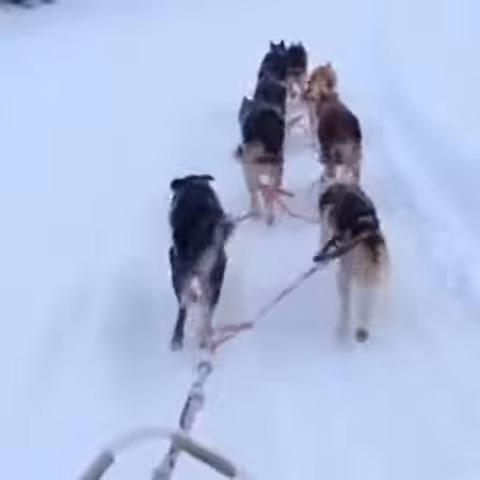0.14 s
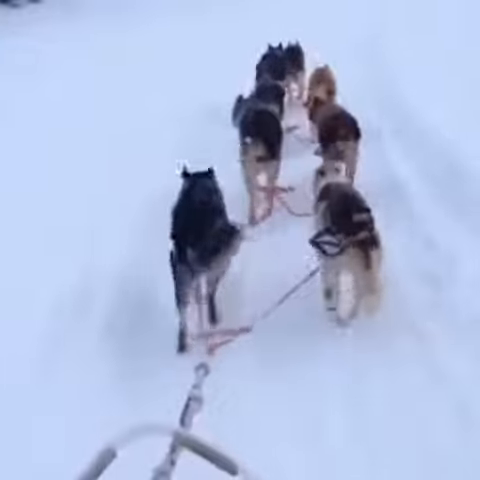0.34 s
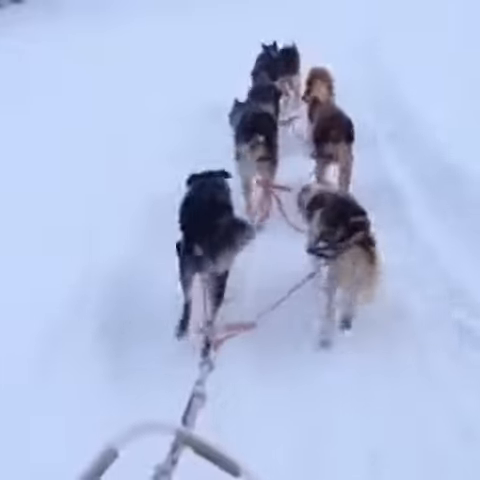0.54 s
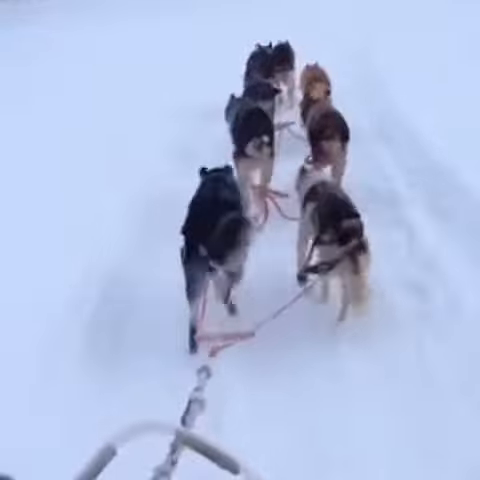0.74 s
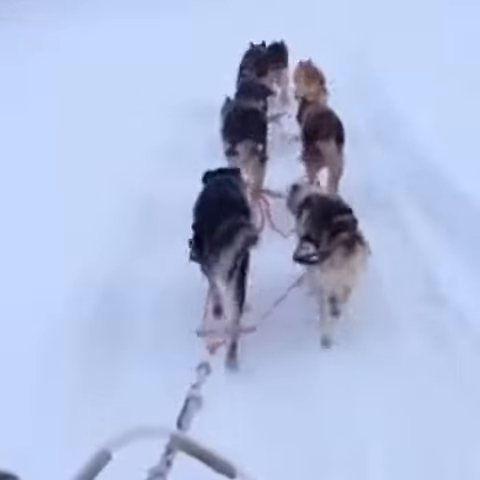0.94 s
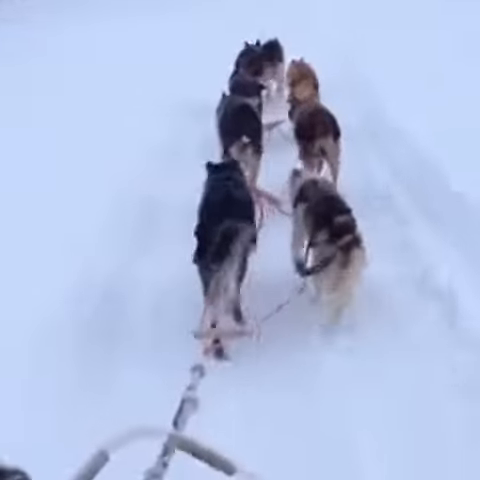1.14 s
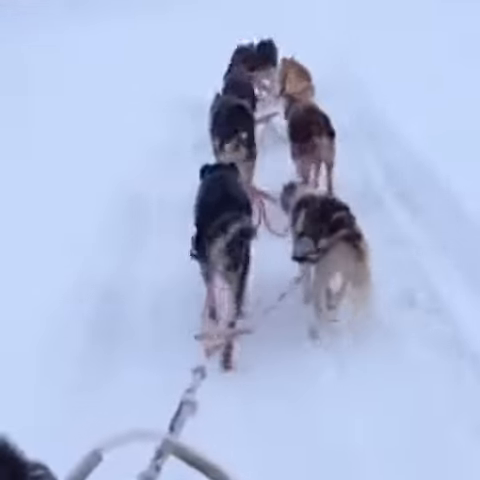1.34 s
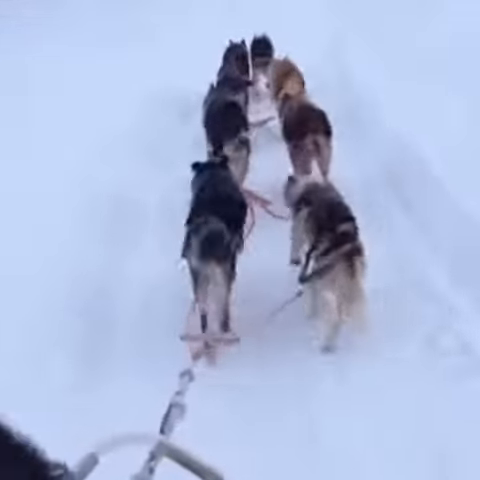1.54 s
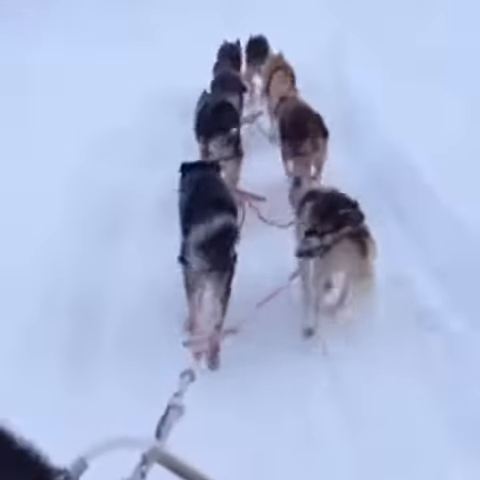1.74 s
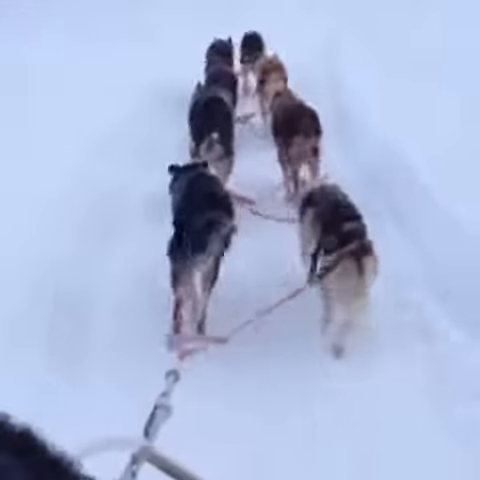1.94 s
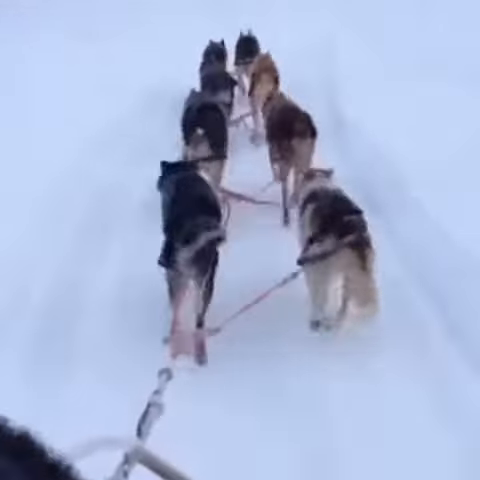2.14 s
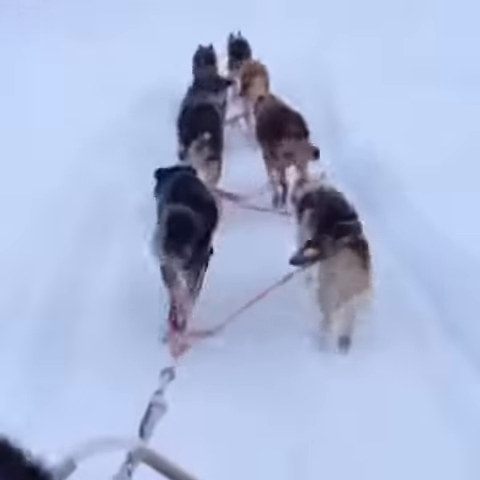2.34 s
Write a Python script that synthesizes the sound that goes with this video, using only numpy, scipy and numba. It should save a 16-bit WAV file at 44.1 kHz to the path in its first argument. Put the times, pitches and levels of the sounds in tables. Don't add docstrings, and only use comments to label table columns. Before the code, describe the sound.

A grainy, steady snow glide heard from aboard a dog sled in the open, with dull frame knocks, soft wind buffets, a sharp ice crack midway, later rougher scuffs and tiny high metal squeaks.

```python
import sys
import numpy as np
from scipy import signal
from scipy.io import wavfile
from scipy.ndimage import uniform_filter1d
from numba import njit

SR = 44100
rng = np.random.default_rng(int(sys.argv[2]) if len(sys.argv) > 2 else 0)


def master_out(mix):
    frames = np.transpose(np.atleast_2d(mix))
    ceiling = np.clip(frames, -1, 1)
    pcm = np.round(ceiling * 32767).astype(np.int16)
    wavfile.write(sys.argv[1], SR, pcm)


def elevation(decibels):
    levels = np.asarray(decibels, float)
    return 10 ** (levels / 20)


N = 110250

# time in seconds, hiss level in dB, softness of the snow in dB.
GLIDE = [(0, -44, 1), (.04, -46.5, 1), (.165, -47, 1), (.18, -44, 1.5), (.3, -46, 1.3), (.5, -46.5, 1.1),
         (.8, -46.5, 1), (1.0, -45.5, 1), (1.2, -46.5, 0.4), (1.35, -48.5, 0.5), (1.5, -47, 0.5),
         (1.72, -49, 0.5), (1.95, -49.5, 0.5), (2.2, -50.5, 0), (2.34, -49.5, 0.5), (2.5, -47.5, 0.5)]
# frequency in Hz, level in dB per Hz.
SNOW_COLOUR = [(290, -19), (500, -3), (952, -3.5), (2000, -4), (2830, 0), (3210, -19), (4040, -2),
               (11500, -14.5), (15300, -23.5)]
# frequency in Hz, width in Hz, level in dB.
RUNNER_RINGS = [(398.4, 97, -11), (752, 58, -16.5), (1817, 250, -19.5), (3400, 520, -9.5),
                (3930, 540, -11.5)]
# time in seconds, shaking in dB, wind in dB.
SHAKE_AND_WIND = [(0, -35.5, -41), (.26, -39, -53), (.54, -43.5, -48.5), (.85, -39.5, -48.5),
                  (1.0, -37.5, -52), (1.12, -37.5, -44), (1.23, -41.5, -47.5), (1.5, -33, -48),
                  (1.72, -38.5, -52), (2.0, -31, -49), (2.2, -32.5, -49), (2.33, -38, -44), (2.5, -36, -47)]
# frequency in Hz, width in Hz, level in dB.
FRAME_RINGS = [(144, 48, 0.5), (187.7, 32.5, -4.5), (238, 53, -1.5), (302.3, 33, -6), (403.7, 72, -5.5)]
# middle in seconds, level in dB, pitch in Hz, length in seconds.
BUMPS = [(0.028, -38.5, 382, 0.021), (0.286, -30, 174, 0.0058), (0.455, -31.5, 244.5, 0.0092),
         (0.649, -30, 177.8, 0.0057), (.01, -36, 174.7, .02), (.27, -38, 400, 0.02),
         (.35, -41.5, 330, 0.021), (.625, -41.5, 250, 0.026), (.835, -36.5, 290, 0.032),
         (.86, -38.5, 200, 0.032), (.928, -39, 400, 0.037), (2.012, -27, 155, 0.014), (1.81, -39, 128, .06),
         (2.22, -34, 135, .04), (2.045, -37, 110, .02), (2.41, -38, 110, .04), (2.024, -35, 217.7, .014),
         (2.268, -33.5, 225, 0.013), (2.285, -34, 199.7, 0.019), (0.964, -26.5, 190.2, 0.011),
         (0.985, -28, 199.4, 0.0049), (1.032, -29, 234.4, 0.018), (1.075, -29, 212.2, 0.0099),
         (1.153, -27.5, 188, 0.012), (1.167, -24, 290, 0.0087), (1.166, -37.5, 728, 0.0085),
         (1.177, -30.5, 149, 0.017), (1.214, -38.5, 184.4, .02), (1.255, -38.5, 159.6, 0.013),
         (1.298, -40.5, 300, 0.023), (1.335, -35.5, 180, 0.039), (1.365, -41, 244.4, 0.034),
         (1.43, -41.5, 390, 0.021), (1.182, -32, 290, .013), (1.443, -31, 169.7, 0.026),
         (1.53, -33, 199.3, 0.035), (1.572, -32.5, 206.5, 0.0091), (1.868, -32.1, 224.3, 0.009),
         (1.93, -38, 225.3, 0.011), (1.962, -20.5, 190.1, .007), (1.998, -19.5, 169.6, 0.0097),
         (2.042, -26.5, 165.8, 0.014), (2.063, -31, 171.4, 0.0071), (2.115, -42, 162.7, 0.0075),
         (2.137, -30.5, 250.7, 0.0086), (2.188, -27, 219.6, 0.011), (2.209, -36.5, 301, 0.014),
         (2.228, -32, 232.8, 0.0085), (2.245, -32.5, 139.8, 0.023), (2.373, -26.5, 183.5, 0.0045),
         (2.434, -25, 247.3, 0.016), (2.484, -34, 258, 0.028)]
# middle in seconds, level in dB, pitch in Hz, length in seconds.
BUFFETS = [(0.036, -44, 58, 0.025), (0.135, -33.5, 70, 0.019), (0.35, -38, 75.1, 0.02),
           (0.593, -35, 67, 0.014), (0.978, -28, 75, 0.018), (1.04, -39, 56.5, 0.015),
           (1.155, -33, 95.1, 0.0087), (1.554, -38, 70, 0.016), (1.609, -41, 75.2, 0.026),
           (2.058, -40, 76.3, 0.017), (2.104, -38.5, 59.2, 0.043), (2.365, -31.5, 69.8, 0.017)]
# middle in seconds, level in dB, centre in Hz.
SIDE_PATCHES = [
    (.083, -58, 7600),
    (.768, -50, 4900),
    (.78, -62, 11700),
    (.875, -56, 6000),
    (.875, -60, 12200),
    (.967, -50.5, 4900),
    (.967, -56, 6900),
]
# start in seconds, peak in dB, ring in Hz, crunch in dB.
TICKS = [
    (.175, -27, 3900, 2),
    (1.0785, -22, 4200, 3),
    (1.160, -23, 4300, 4),
    (1.242, -23.5, 4000, 2),
    (1.2825, -23, 4800, 4),
    (1.4706, -14, 4700, -6),
    (1.4828, -26, 2300, -6),
    (1.0795, -27, 2400, 0),
]
# middle in seconds, level in dB, pitch in Hz, length in seconds.
RASPS = [(.226, -45, 1760, 0.022), (0.258, -44, 1780, 0.013), (1.783, -45.5, 1870, 0.029),
         (1.927, -42, 1800, 0.021), (2.225, -42, 1930, .012), (2.4, -45, 1800, 0.011),
         (1.7, -44, 1940, .02), (1.6, -45, 3380, .012), (1.89, -46, 4300, .018), (1.912, -40, 4100, 0.015),
         (1.917, -43, 3500, 0.015), (1.927, -45, 3030, .012), (2.007, -44, 3250, 0.013),
         (2.067, -44, 3600, 0.017), (2.177, -41, 3870, .009), (2.176, -46, 4700, .008),
         (2.256, -45.5, 3960, .014), (2.264, -46, 3170, .01), (2.288, -39.5, 3440, .011),
         (2.299, -37.5, 3300, .013), (1.465, -48.5, 3200, 0.031), (1.505, -46.5, 3630, .018),
         (1.628, -42, 3200, .03), (1.636, -42.5, 4140, .022), (1.5, -45, 5400, .014),
         (1.8, -45, 6600, .014), (1.4, -47, 6250, 0.029), (2.48, -45, 1900, .01), (2.496, -41, 1850, .012)]
# middle in seconds, level in dB, centre in Hz, length in seconds.
SCUFFS = [(.19, -47, 3800, 0.03), (1.22, -52, 6000, 0.053), (1.477, -43, 1000, .016),
          (1.508, -47, 1300, .035), (1.638, -39.5, 4500, .036), (1.675, -47, 4500, .03),
          (1.922, -42.5, 2600, .022), (2.21, -47, 3000, .05), (2.45, -45, 2100, .04),
          (2.29, -46, 5000, .03), (1.87, -48, 3000, .018), (1.9, -42, 3700, .045), (1.994, -42, 2300, .009),
          (2.055, -46, 4200, .03), (2.098, -48, 2300, .025), (2.176, -42.5, 3500, 0.011),
          (2.26, -43, 4300, 0.036), (2.304, -44, 1500, .012), (2.42, -46, 4870, 0.025),
          (2.45, -40.5, 3600, 0.015), (2.49, -36.5, 4300, 0.03)]
# middle in seconds, level in dB, pitch in Hz, length in seconds.
SQUEAKS = [(.634, -59.5, 11740, .012), (.648, -46, 11770, .007), (1.035, -47, 11830, .004),
           (1.207, -51, 11800, 0.024), (1.417, -46.5, 11780, 0.047), (1.951, -55, 12000, 0.017),
           (1.947, -58, 13950, .008), (2.197, -49.5, 11765, .024), (2.197, -45.5, 7200, 0.037),
           (2.333, -51, 11820, .006), (2.482, -48, 10750, 0.007)]


def level(x, db):
    return x * elevation(db) / np.sqrt(np.mean(x ** 2))


def curve(table, column):
    rows = np.array(table, float)
    return np.interp(np.arange(N) / SR, rows[:, 0], rows[:, column])


@njit
def resonator(x, hz, width):
    y, band, low = np.empty(len(x)), 0., 0.
    g, damping = np.tan(np.pi * hz / SR), width / hz
    for i in range(len(x)):
        v = (band + g * (x[i] - low)) / (1 + g * (g + damping))
        band, low = 2 * v - band, low + 2 * g * v
        y[i] = damping * v
    return y


def narrow(x, hz, width, second_width=None):
    once = resonator(x, float(hz), float(width))
    return resonator(once, float(hz), float(second_width or width))


def walk(rate):
    k = int(SR / rate)
    steps = np.repeat(rng.standard_normal(N // k + 1), k)
    return 1.44 * uniform_filter1d(uniform_filter1d(steps, k), k)[:N]


def crystals(spread_db):
    size_db = spread_db * np.minimum(rng.exponential(size=N), 5)
    return level(rng.standard_normal(N) * elevation(size_db), 0)


def swells(table, stretch, edge, gain_db, carrier):
    out = np.zeros(N)
    for s, db, hz, length in table:
        reach = 2 * stretch * length
        i = np.arange(max(int((s - reach) * SR), 0), min(int((s + reach) * SR), N))
        u = (i / SR - s) / (.5 * stretch * length)
        out[i] += elevation(db + gain_db) * np.exp(-np.abs(u) ** edge) * carrier(i, hz)
    return out


def ring(wobble, rate):
    drift = np.cumsum(1 + wobble * walk(rate)) / SR

    def tone(i, hz):
        since_middle = drift[i] - drift[i[len(i) // 2]]
        return np.sqrt(2) * np.sin(2 * np.pi * hz * since_middle + hz)
    return tone


def snow():
    grain_db, flicker_db, swell_db = 2.5, .9, .5
    softness, colour = curve(GLIDE, column=2), np.array(SNOW_COLOUR, float)
    swell = walk(22) + walk(40)
    shared_grit = crystals(grain_db)
    hiss = np.zeros(N)
    for hz in np.geomspace(450, 15500, num=20):
        db = np.interp(np.log(hz), np.log(colour[:, 0]), colour[:, 1])
        db = db + 10 * np.log10(hz)
        db = db + flicker_db * walk(18)
        db = db + softness * np.log2(3500 / hz)
        source = 0.8 * shared_grit + 0.59 * crystals(grain_db)
        hiss += elevation(db) * level(narrow(source, hz, hz * 0.4), 0)
    out = level(hiss, 0)
    for hz, width, db in RUNNER_RINGS:
        tone = level(narrow(crystals(grain_db), hz, width, 2 * width), 0)
        out += elevation(db + 1.2 * walk(29.85) + 0.87 * softness) * tone
    return out * elevation(curve(GLIDE, column=1) + swell_db * swell + 6.0)


def frame():
    shake = np.zeros(N)
    for hz, width, db in FRAME_RINGS:
        tone = level(narrow(rng.standard_normal(N), hz, 1.46 * width), 0)
        shake += elevation(db + 2.25 * walk(25.9)) * tone
    rumble = level(shake, 0) * elevation(curve(SHAKE_AND_WIND, column=1) + 1.2 * walk(25.24) - 3.0)
    thump = ring(0.071, 70)
    slats = level(narrow(rng.standard_normal(N), 415, 410), -18.5)
    bumps = swells(BUMPS, 1.285, 2.27, -0.12, lambda i, hz: thump(i, hz) + slats[i])
    return rumble + bumps


def wind():
    air = level(narrow(rng.standard_normal(N), 62, 77, 90), 0)
    rumble = air * elevation(curve(SHAKE_AND_WIND, column=2) + 1.7 * walk(5.9) - 0.5)
    return rumble + swells(BUFFETS, 1.38, 1.6, -0.81, ring(0.079, 25.5))


def side_patches():
    noise = rng.standard_normal(N)

    def hiss(i, hz):
        band = signal.butter(6, [hz - 750, hz + 750], "band", fs=SR, output="sos")
        return level(signal.sosfilt(band, noise[i]), 0)
    rows = [(s, db, hz, .036) for s, db, hz in SIDE_PATCHES]
    return swells(rows, 0.84, 4., 0, hiss)


def ticks():
    rise_s, tail_s, ring_db, size = .0012, .0022, 1, 1500
    out, t = np.zeros(N + size), np.arange(size) / SR - rise_s
    click = np.zeros(size)
    click[int(rise_s * SR)] = 1
    fade = np.exp(-np.abs(t) / np.where(t < 0, .0005, tail_s))

    def full(v):
        return v / np.abs(v).max()

    def colour(v, hz):
        return full(resonator(resonator(v, 1. * hz, 1.2 * hz), .8 * hz, 1.9 * hz))
    for s, db, hz, crunch_db in TICKS:
        crunch = rng.standard_normal(size) * fade
        snap = colour(click, hz) + elevation(crunch_db) * colour(crunch, hz)
        snap += elevation(ring_db) * full(resonator(click, 1. * hz, 0.083 * hz))
        start = int(s * SR)
        out[start:start + size] += elevation(db + 0.5) * full(snap)
    return out[:N]


def scuffs():
    grit = crystals(4.1)

    def band(i, hz, share):
        v = narrow(grit[i], hz, share * hz)
        return v / np.std(v[len(v) * 3 // 8:len(v) * 5 // 8])

    def rasp(i, hz):
        return band(i, hz, .16)

    def scrape(i, hz):
        return 0.85 * band(i, 0.97 * hz, 0.87) + .3 * band(i, hz, 0.33)
    rasps = swells(RASPS, 1.3, 2, 0, rasp)
    return rasps + swells(SCUFFS, 1.15, 2.5, -1, scrape) * elevation(1.1 * walk(90))


def clip_squeaks():
    return swells(SQUEAKS, 0.56, 6.3, .1, ring(.002, 200)) * elevation(1.4 * walk(250))


def scene():
    mono = snow() + frame() + wind() + ticks() + scuffs() + clip_squeaks()
    side = side_patches()
    return np.array([mono + side, mono - side])


def band_limit(x):
    return signal.sosfilt(signal.butter(12, 15570, fs=SR, output="sos"), x)


def record(dry):
    low_pass = signal.ellip(10, .2, 50, 15380, fs=SR, output="sos")
    mix = signal.sosfilt(low_pass, dry)
    return band_limit(mix)


dry = scene()
out = record(dry)
master_out(out)
```